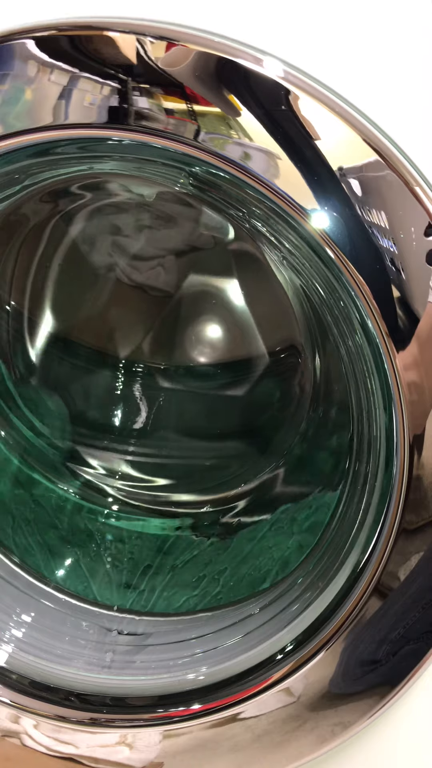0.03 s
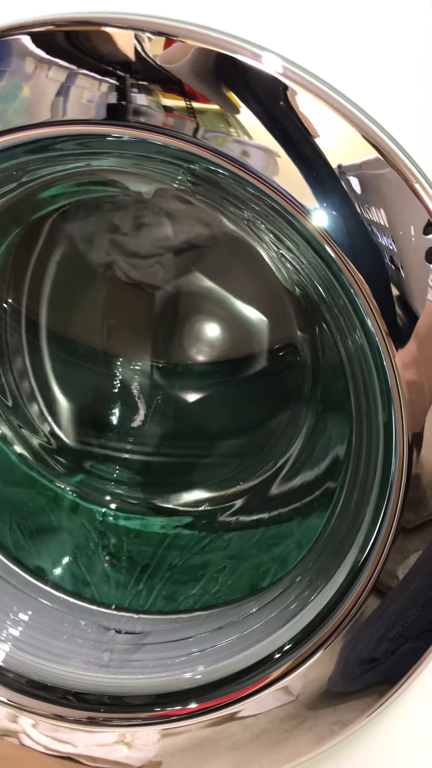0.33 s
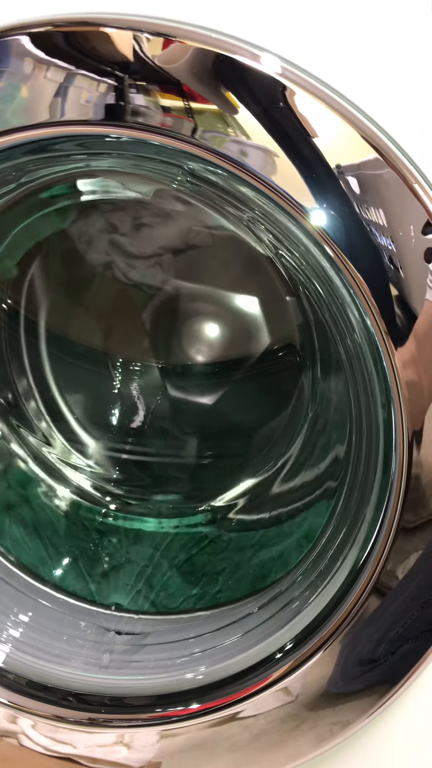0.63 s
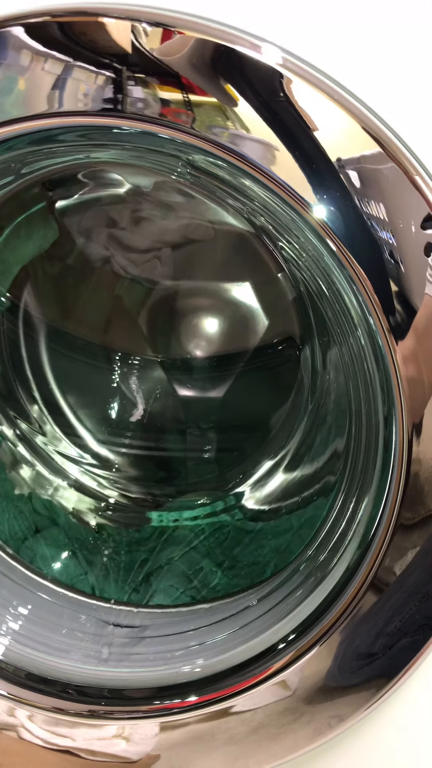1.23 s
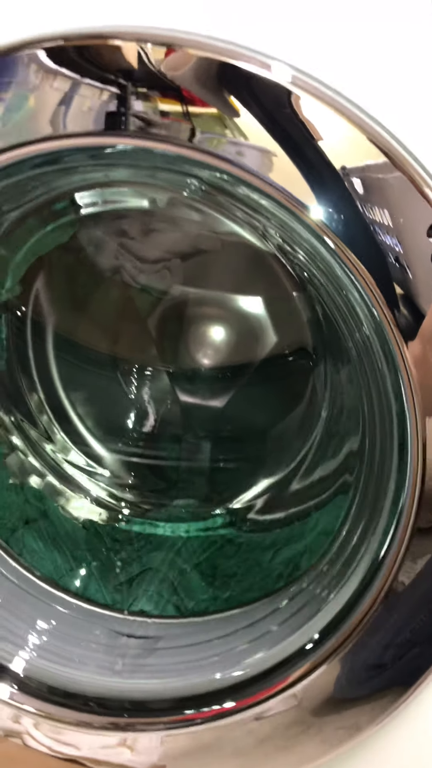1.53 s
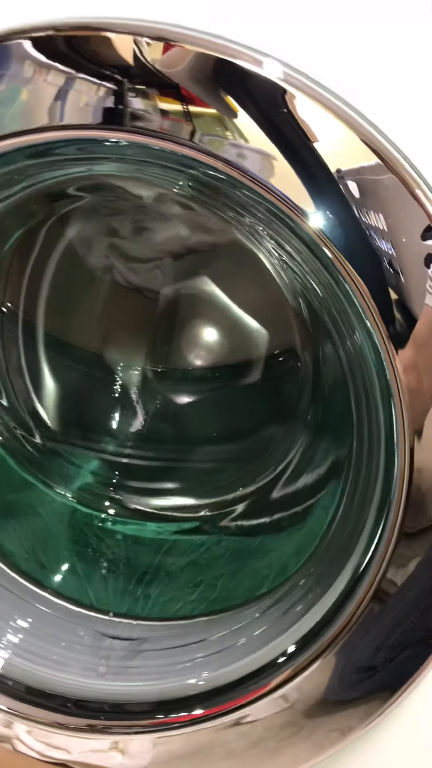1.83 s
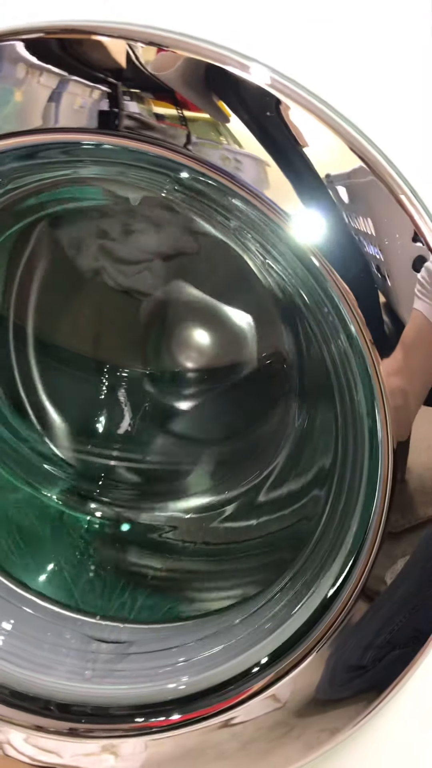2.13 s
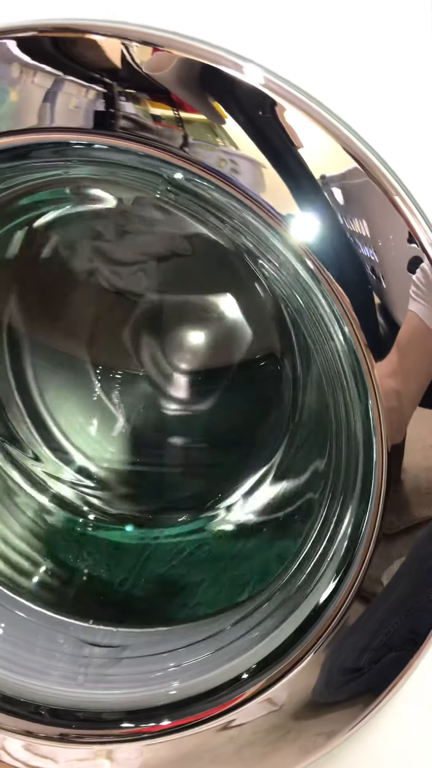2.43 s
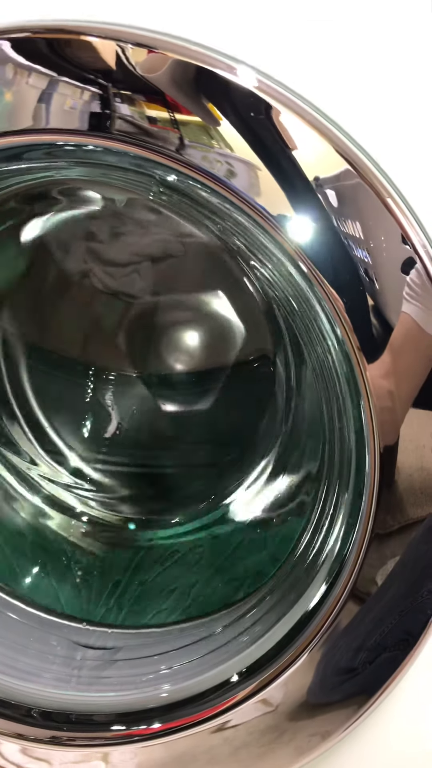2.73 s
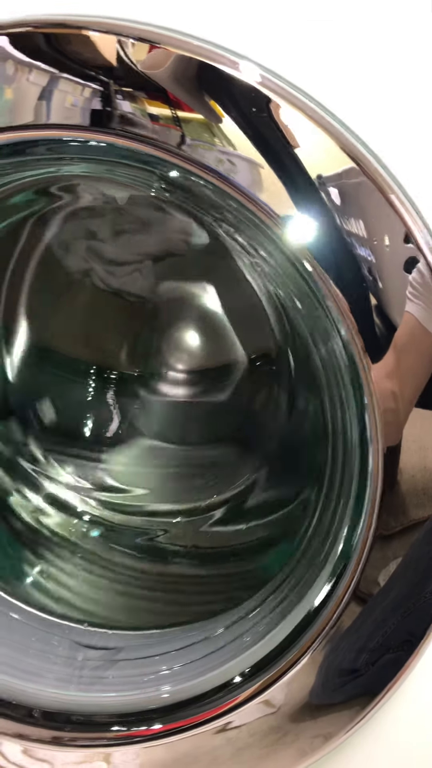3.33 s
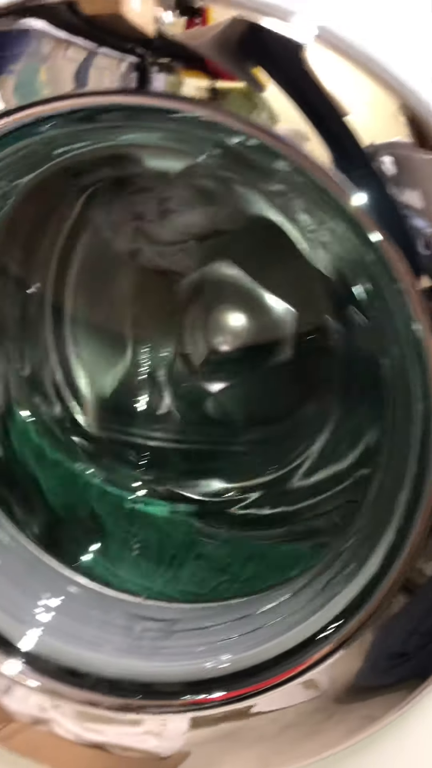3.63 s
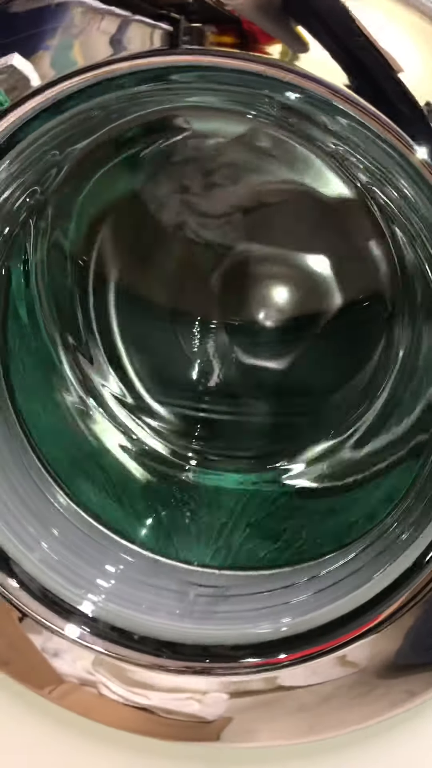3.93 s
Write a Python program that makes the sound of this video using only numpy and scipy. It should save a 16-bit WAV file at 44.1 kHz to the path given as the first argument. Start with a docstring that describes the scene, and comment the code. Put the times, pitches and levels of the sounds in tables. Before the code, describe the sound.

A washing machine pump starts with rattling knocks, then hums under gurgling, rushing water.

```python
"""A switch clicks in a quiet room and a front-loading washing machine starts its pump.
The rotor knocks a few times, locks to the mains and hums. Water sprays, slurps and gurgles in,
runs quietly for a moment, then the impeller churns air and water in a steady rush that rings the hose.
Click, knocks and water sound through the resonances of the cabinet."""
import sys
import numpy as np
from scipy import signal
from scipy.fft import rfft, irfft
from scipy.io import wavfile

SR = 44100
rng = np.random.default_rng(int(sys.argv[2]) if len(sys.argv) > 2 else 0)


def to_wav(s):
    """Save 16-bit WAV."""
    ch = np.atleast_2d(s).T  # columns
    pcm = np.round(np.clip(ch, -1, 1) * 32767)  # PCM
    wavfile.write(sys.argv[1], SR, pcm.astype(np.int16))


N = 176400
T = np.arange(N) / SR


def from_db(db):
    """Decibels to gain."""
    return 10 ** (np.asarray(db) / 20)


def unit_rms(x):
    """Scale to unit power."""
    return x / np.sqrt(np.mean(x ** 2) + 1e-20)


def level(curve):
    """Gain along (t/s, level/dB), silent before the first point."""
    t_s, db = np.transpose(curve)
    return from_db(np.interp(T, t_s, db, left=-150))


def drift(rate_hz):
    """Low-passed noise, unit RMS."""
    hz = np.arange(N // 2 + 1) * SR / N
    return unit_rms(irfft(rfft(rng.standard_normal(N)) / (1 + (hz / rate_hz) ** 2), N))


def colour(x, spectrum):
    """Filter by (f/Hz, level/dB), then scale to unit RMS."""
    hz, db = np.transpose(spectrum)
    bins_hz = np.arange(1, N // 2 + 2) * SR / N
    gain = from_db(np.interp(np.log(bins_hz), np.log(hz), db))
    return unit_rms(irfft(rfft(x) * gain, N))


def grains(per_s, spread_db):
    """Random clicks of uneven size."""
    sizes = from_db(spread_db * np.minimum(rng.exponential(1, N), 5)) * rng.choice([-1, 1], N)
    return sizes * (rng.random(N) < per_s / SR)


def blows(times_s, levels_db, t60_s, attack_s=0.0016):
    """Impact envelope: fast rise, exponential decay, summed in power."""
    power = np.zeros(N)
    for t_s, db in zip(times_s, levels_db):
        age_s = np.maximum(T - t_s, 0)
        power += (np.minimum(age_s / attack_s, 1) * from_db(db - 60 * age_s / t60_s)) ** 2
    return np.sqrt(power)


def swells(rows):
    """Envelope of rounded swells (t/s, length/s, level/dB)."""
    envelope = np.zeros(N)
    for t_s, length_s, db in rows:
        progress = np.clip((T - t_s) / length_s, 0, 1)
        envelope += from_db(db) * np.sqrt(np.abs(np.sin(np.pi * progress)))
    return envelope


def ring(clicks, hz, t60_s):
    """Resonator: a unit click starts a decaying unit sine."""
    r, w = from_db(-60 / (t60_s * SR)), 2 * np.pi * hz / SR
    return signal.lfilter([0, np.sin(w)], [1, -2 * r * np.cos(w), r * r], clicks + 1e-18)


# room noise spectrum: f/Hz, level/dB
ROOM_SPECTRUM = [(20, -15), (38, -13.5), (60, 2.5), (82, -12), (150, -9.5), (240, -16), (420, -11.5),
                 (490, -20), (600, -19.5), (900, -22.5), (2000, -28), (5000, -31), (10500, -36.5),
                 (12500, -31), (15500, -37)]

def room(level_db=-66.5):
    """Faint steady rumble."""
    return from_db(level_db) * colour(rng.standard_normal(N), ROOM_SPECTRUM)


# switch click: t/s, level/dB
CLICKS = [(1.315, -40)]
# click spectrum: f/Hz, level/dB
CLICK_SPECTRUM = [(100, -42), (700, -9), (2000, -6.5), (4000, -0.5), (8000, 1.5), (12000, -2), (16000, -10)]

def switch():
    """Bright click at power-on."""
    return blows(*np.transpose(CLICKS), t60_s=0.14) * colour(rng.standard_normal(N), CLICK_SPECTRUM)


def rotor_angle(lock_s=1.5, run_up_hz=52.9, mains_hz=59.95):
    """Angle in rad: the rotor lags during run-up, then turns once per mains cycle."""
    turn_hz = np.where(T < lock_s, run_up_hz, mains_hz)
    return 2 * np.pi * np.cumsum(turn_hz) / SR + 0.048 * drift(4.5)


def overtone(angle, order, waver_hz=14, waver_db=1.5, jitter_rad=0.25):
    """One multiple of the turning rate, unsteady in level and phase."""
    phase = order * angle + rng.uniform(0, 2 * np.pi) + jitter_rad * drift(waver_hz)
    return from_db(waver_db * drift(waver_hz)) * np.sin(phase)


# hum, rotor order 2: t/s, level/dB
HUM_LEVELS = [(1.33, -57), (1.37, -36.5), (1.47, -38.5), (1.542, -29), (1.568, -36.5), (1.6, -33),
              (2.47, -30.7), (2.56, -33.5), (2.62, -30), (2.665, -36), (2.7, -32), (4.0, -31)]
# rotor overtones: t/s, level/dB of order 3, of order 4, of order 6
ORDER_LEVELS = [(1.5, -62.5, -57.5, -59), (2.65, -63, -57, -63), (2.8, -59, -48, -62),
                (2.96, -60, -47, -63), (3.04, -56, -49, -49.5), (3.13, -51.5, -49, -52),
                (3.42, -48.5, -45.5, -49.5), (3.55, -57, -48.5, -49), (3.77, -49.5, -49, -51),
                (3.86, -64, -43.5, -45.5), (4.0, -51, -43, -52.5)]

def motor(angle, waver_db=0.45, shudder_hz=79.3, fifth_re_sixth_db=-7.5):
    """Hum, with rough overtones under load; the pump shudders on its mounts until the rotor settles."""
    hum = level(HUM_LEVELS) * from_db(waver_db * drift(33)) * np.sin(2 * angle)
    shudder = swells([(1.33, 0.235, -43.5)]) * np.sin(2 * np.pi * shudder_hz * T)
    t_s, *orders_db = np.transpose(ORDER_LEVELS)
    third, fourth, sixth = (level(np.column_stack([t_s, db])) for db in orders_db)
    gains = {3: third, 4: fourth, 5: from_db(fifth_re_sixth_db) * sixth, 6: sixth}
    buzz = sum(gain * overtone(angle, order) for order, gain in gains.items())
    return np.sqrt(2) * (hum + shudder + buzz)


# spray envelope: t/s, level/dB
SPRAY_LEVELS = [(1.33, -59), (1.53, -53.5), (1.58, -58), (1.65, -52), (1.70, -48.5), (1.712, -46.5),
                (1.745, -41.5), (1.8, -49), (1.85, -51), (1.9, -48), (1.96, -53.5), (2.13, -62.5),
                (2.4, -62.5), (4.0, -96)]
# spray spectrum: f/Hz, level/dB
SPRAY_SPECTRUM = [(100, -11), (600, -2), (1300, 5.5), (2000, 0), (2750, -0.5), (3400, 2), (4100, -3),
                  (5000, -4), (6500, -7), (8000, -7.5), (10500, -12.5), (13000, -12), (16000, -19)]

def spray():
    """Bright splatter: the impeller flings the first water about while the pump primes."""
    drops = unit_rms(grains(per_s=3400, spread_db=2.5)) + 0.59 * rng.standard_normal(N)
    return level(SPRAY_LEVELS) * colour(drops, SPRAY_SPECTRUM)


def bubbles(sizes=28, t60_cycles=16.7, turbulence_db=4):
    """Bubbles of many sizes ring briefly in turbulent noise."""
    births = grains(per_s=2500, spread_db=1.5)
    size_index = rng.integers(0, sizes, N)
    ringing = np.zeros(N)
    for k, hz in enumerate(np.geomspace(150, 2200, sizes)):
        ringing += hz * ring(births * (size_index == k), hz, t60_cycles / hz)
    return unit_rms(ringing) + from_db(turbulence_db) * rng.standard_normal(N)


# gurgle envelope: t/s, level/dB
GURGLE_LEVELS = [(1.33, -52), (1.4, -45.5), (1.54, -41.5), (1.59, -56), (1.72, -43), (1.84, -46.5),
                 (1.93, -43.5), (2.06, -46.5), (2.14, -52), (2.38, -52), (2.47, -47), (2.75, -54.5),
                 (3.05, -52.5), (3.15, -46), (3.25, -50.5), (3.76, -52.5), (3.86, -47), (4.0, -53.5)]
# gurgle spectrum: f/Hz, level/dB
GURGLE_SPECTRUM = [(40, -31), (90, 4.5), (160, 3.5), (260, 0), (400, -0.5), (600, -3.5), (900, -4),
                   (1300, -14), (1800, -17.5), (4000, -41), (16000, -31)]

def gurgle(flutter_db=1.7):
    """Water bubbles through the pump housing."""
    return level(GURGLE_LEVELS) * from_db(flutter_db * drift(35)) * colour(bubbles(), GURGLE_SPECTRUM)


# rotor knocks: t/s, rattle level/dB, thud level/dB
ROTOR_KNOCKS = [(1.334, -67, -39), (1.353, -29, -26), (1.385, -32, -29.5), (1.410, -40, -38.5),
                (1.453, -33, -35.5), (1.477, -40, -43.5), (1.505, -36, -58), (1.514, -36, -44),
                (1.608, -49, -44.5), (1.707, -37, -35.5)]
# contact rattle spectrum: f/Hz, level/dB
RATTLE_SPECTRUM = [(100, -9), (800, -10), (1600, -9.5), (3000, -4), (5500, -11), (8000, -18),
                   (12000, -20.5), (16000, -33)]
# cabinet thud spectrum: f/Hz, level/dB
THUD_SPECTRUM = [(40, -32), (85, -10), (170, -0.5), (290, -1.5), (400, -1.5), (600, 4), (800, -7),
                 (1250, -2), (1800, -6.5), (4000, -26), (16000, -52)]
# room tail spectrum: f/Hz, level/dB
TAIL_SPECTRUM = [(100, -16), (600, 13.5), (1300, -7), (3000, 1.5), (6000, -1), (9000, -5), (13000, -10),
                 (16000, -10)]

def knocks(tail_re_rattle_db=-15):
    """The starting rotor knocks: short contact rattle, longer cabinet thud, soft room tail."""
    t_s, rattle_db, thud_db = np.transpose(ROTOR_KNOCKS)
    rattle = colour(grains(per_s=7900, spread_db=1.0), RATTLE_SPECTRUM)
    thud = colour(rng.standard_normal(N), THUD_SPECTRUM)
    tail = colour(rng.standard_normal(N), TAIL_SPECTRUM)
    return (blows(t_s, rattle_db, t60_s=0.067) * rattle
            + blows(t_s, thud_db, t60_s=0.1) * thud
            + blows(t_s, rattle_db + tail_re_rattle_db, t60_s=0.41) * tail)


# pump housing modes: f/Hz, level/dB, t60/s
HOUSING_MODES = [(595, -0.5, 0.12), (964, -1.5, 0.058), (1266, 3, 0.082), (1354, -10, 0.052),
                 (1653, -3.5, 0.038)]

def housing(re_thud_db=-4.5, scatter_db=4, lag_s=0.0055):
    """Each knock rings the housing modes, each at a strength of its own."""
    t_s, _, thud_db = np.transpose(ROTOR_KNOCKS)
    offsets_db = scatter_db * rng.standard_normal((len(t_s), len(HOUSING_MODES)))
    ringing = np.zeros(N)
    for (hz, mode_db, t60_s), offset_db in zip(HOUSING_MODES, offsets_db.T):
        strikes = np.zeros(N)
        strikes[((t_s + lag_s) * SR).astype(int)] = from_db(thud_db + re_thud_db + mode_db + offset_db)
        ringing += ring(strikes, hz, t60_s)
    return ringing


# sloshes: t/s, length/s, level/dB
SUMP_SLOSHES = [(1.86, 0.063, -44), (2.43, 0.076, -48.5), (3.115, 0.074, -47), (3.83, 0.1, -55.5)]
# slosh spectrum: f/Hz, level/dB
SLOSH_SPECTRUM = [(80, -18), (170, -8), (260, 7), (350, 4.5), (500, -30), (4000, -60)]

def sloshes():
    """Low swells of water in the sump."""
    return swells(SUMP_SLOSHES) * colour(bubbles(), SLOSH_SPECTRUM)


# gulps: t/s, length/s, level/dB
AIR_GULPS = [(1.915, 0.025, -47.5), (1.97, 0.02, -52), (2.003, 0.03, -53), (2.04, 0.023, -57),
             (2.388, 0.048, -48), (2.465, 0.25, -51), (3.76, 0.15, -51)]
# gulp spectrum: f/Hz, level/dB
GULP_SPECTRUM = [(200, -36), (700, -34), (1050, 0), (1380, 6.5), (1700, -5), (2200, -45), (8000, -45)]

def gulps():
    """Gulps of air ring the hose."""
    return swells(AIR_GULPS) * colour(bubbles(), GULP_SPECTRUM)


# churn envelope: t/s, level/dB
CHURN_LEVELS = [(2.385, -57), (2.41, -53.5), (2.48, -44.5), (2.66, -50.5), (2.75, -46.5), (2.88, -48),
                (2.98, -44), (3.11, -42), (3.23, -46), (3.4, -43.5), (3.53, -45.5), (3.72, -44.5),
                (3.8, -43), (3.9, -46.5), (4.0, -43.5)]
# churn spectrum: f/Hz, level/dB
CHURN_SPECTRUM = [(100, -10), (300, -32), (600, -7.5), (950, -9.5), (1400, 0), (1750, -3), (2200, -8.5),
                  (3200, -6), (4400, -10), (5200, -13.5), (6300, -14), (7500, -18.5), (9500, -18),
                  (10500, -25), (13000, -23.5), (16000, -35)]

def churn(angle, splash_share=0.18, blade_depth=0.09, flutter_db=1,
          mist_hz=7800, mist_start_db=-12, build_s=0.26):
    """Air and tiny splashes throb with the impeller; fine mist adds treble as the flow builds."""
    air = np.sqrt(1 - splash_share) * rng.standard_normal(N)
    splashes = np.sqrt(splash_share) * unit_rms(grains(per_s=2300, spread_db=1.5))
    rush = colour(air + splashes, CHURN_SPECTRUM)
    mist = signal.sosfiltfilt(signal.butter(1, mist_hz, "high", fs=SR, output="sos"), rush)
    mist_db = mist_start_db * np.clip(1 - (T - CHURN_LEVELS[0][0]) / build_s, 0, 1)
    throb = (1 + blade_depth * np.sin(2 * angle)) * from_db(flutter_db * drift(25))
    return level(CHURN_LEVELS) * throb * (rush - mist + from_db(mist_db) * mist)


# air pocket resonance: t/s, f/Hz
POCKET_PITCH = [(2.55, 1334), (2.75, 1400), (3.12, 1602), (3.25, 1380), (3.4, 1545), (3.8, 1321),
                (4.0, 1449)]

def hose(width_hz=110, re_churn_db=-8):
    """The rush rings an air pocket in the hose; the pitch wanders, higher as the pocket shrinks."""
    pitch_hz = np.interp(T, *np.transpose(POCKET_PITCH))
    phase = 2 * np.pi * np.cumsum(pitch_hz) / SR
    ringing = drift(width_hz) * np.cos(phase) + drift(width_hz) * np.sin(phase)
    return from_db(re_churn_db) * level(CHURN_LEVELS) * unit_rms(ringing)


# cabinet resonances and dips: f/Hz, width/Hz, level/dB
CABINET_BANDS = [(224, 28, 3), (452, 54, 3.5), (499, 37, -8), (595, 57, 6.5), (752, 13, 7.5),
                 (833, 12, -8.5), (1056, 64, 5.5), (1255, 65, 7.5), (1319, 50, 3.5), (1626, 79, 5),
                 (1997, 91, 5.5), (2280, 160, -1.5), (2557, 37, 9), (2737, 94, 6.5), (4077, 380, 7),
                 (5710, 370, 5)]

def cabinet(x):
    """Panel and cavity resonances as peaking filters in series."""
    for hz, width_hz, db in CABINET_BANDS:
        a = from_db(db / 2)
        alpha = np.pi * width_hz / SR
        c = -2 * np.cos(2 * np.pi * hz / SR)
        x = signal.lfilter([1 + alpha * a, c, 1 - alpha * a], [1 + alpha / a, c, 1 - alpha / a], x + 1e-18)
    return x


# reflections: delay/s, level/dB
REFLECTIONS = [(.0031, -20.5), (.0057, -19), (.0093, -20.5)]

def echoes(x, above_hz=3400):
    """Drum, floor and near walls throw the treble back."""
    treble = signal.sosfilt(signal.butter(2, above_hz, "high", fs=SR, output="sos"), x)
    return x + sum(from_db(db) * np.pad(treble, (int(delay_s * SR), 0))[:N] for delay_s, db in REFLECTIONS)


def scene():
    """The machine over the room rumble, mono."""
    angle = rotor_angle()
    rumble = room()
    inside = switch() + knocks() + spray() + churn(angle) + gurgle() + gulps() + sloshes()
    machine = cabinet(inside) + housing() + hose()
    return (echoes(machine) + motor(angle) + rumble)[None]


def record(dry):
    """Steep low-pass."""
    cutoff_hz = 15850
    return signal.sosfilt(signal.ellip(12, .1, 90, cutoff_hz, fs=SR, output="sos"), dry)


dry = scene()
out = record(dry)
to_wav(out)
```